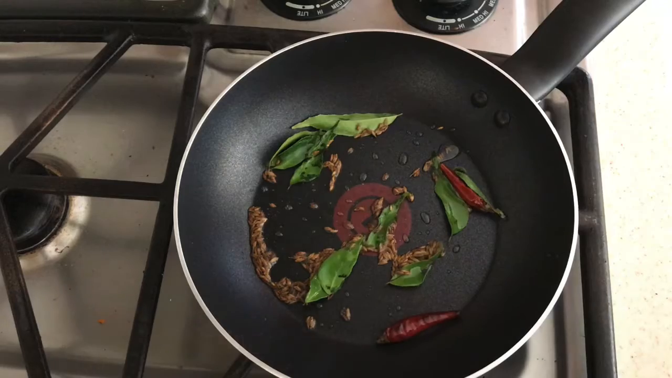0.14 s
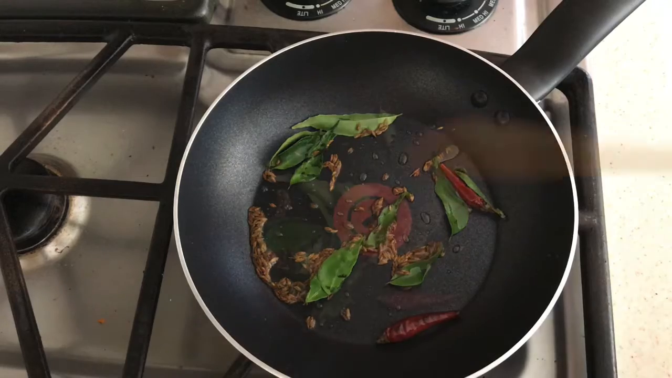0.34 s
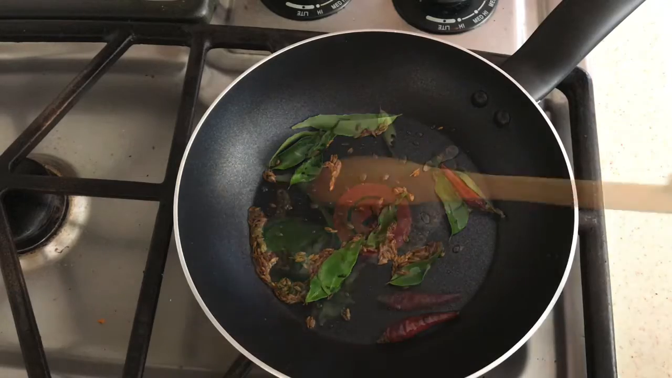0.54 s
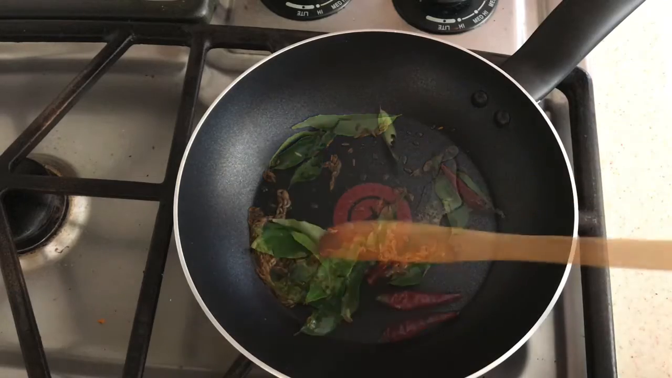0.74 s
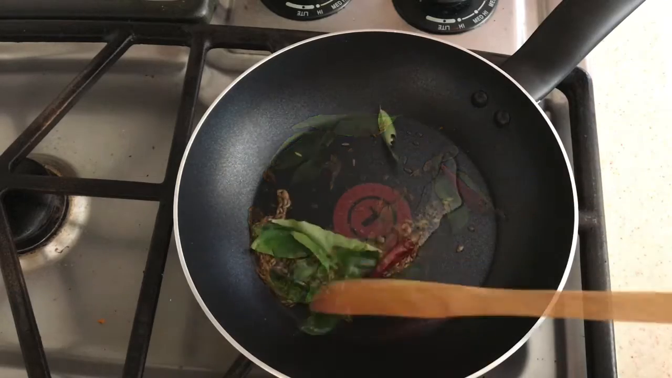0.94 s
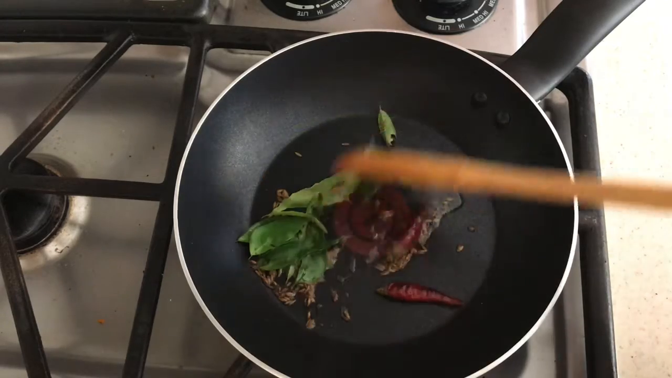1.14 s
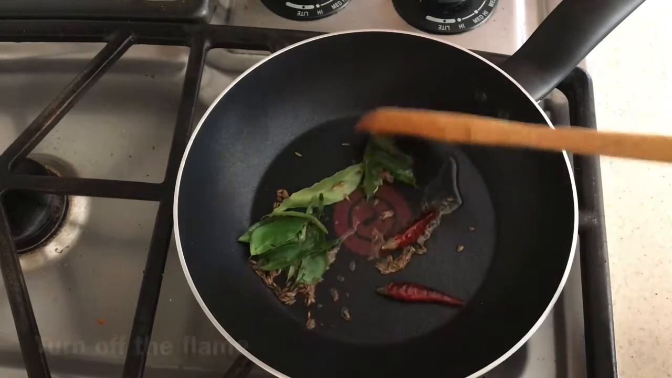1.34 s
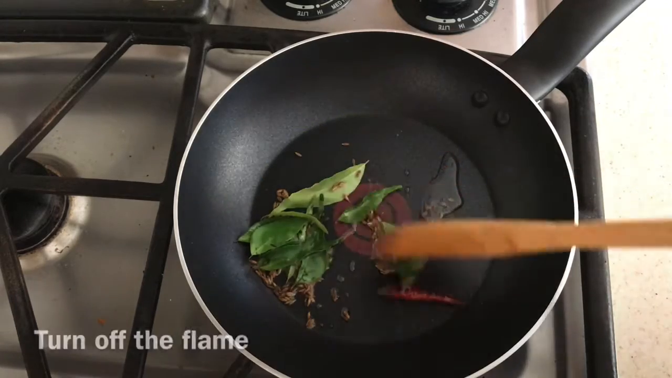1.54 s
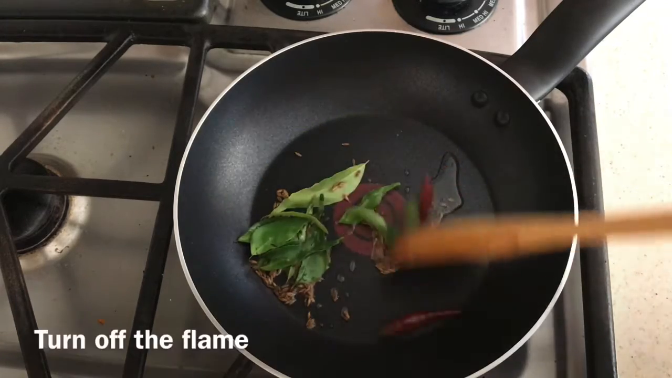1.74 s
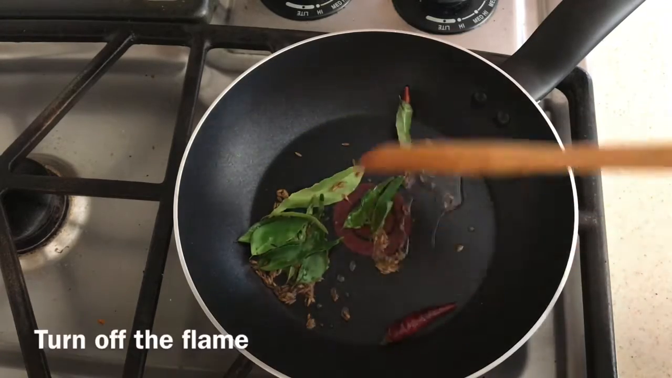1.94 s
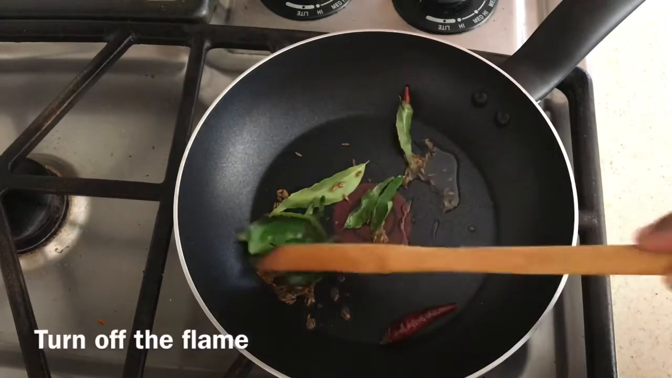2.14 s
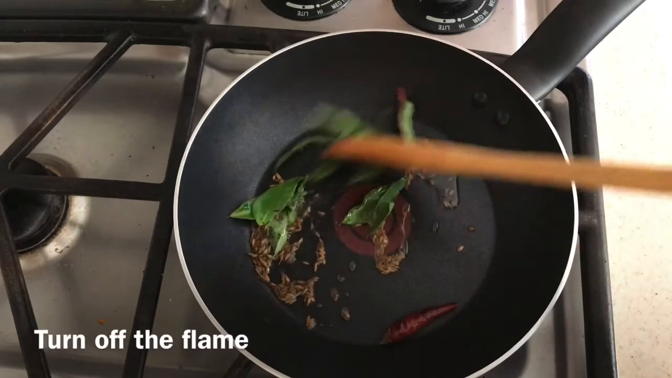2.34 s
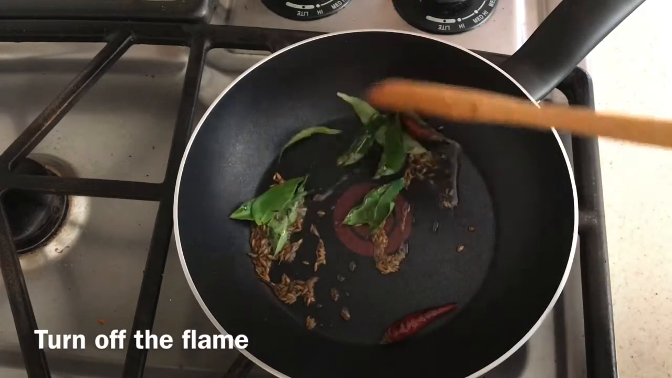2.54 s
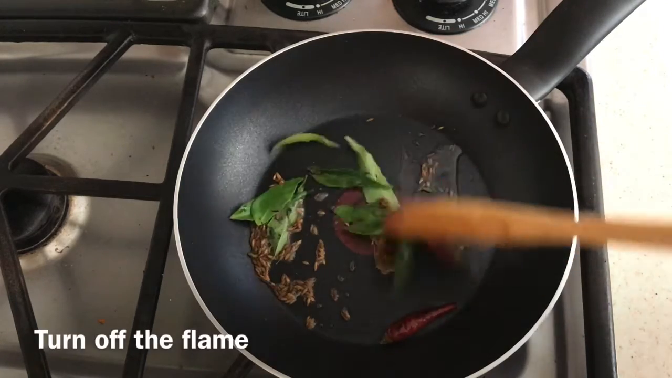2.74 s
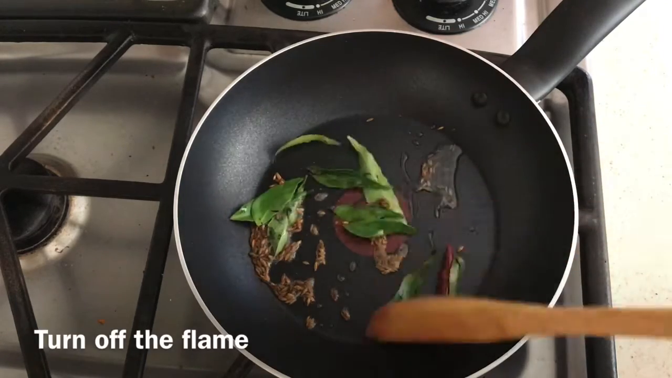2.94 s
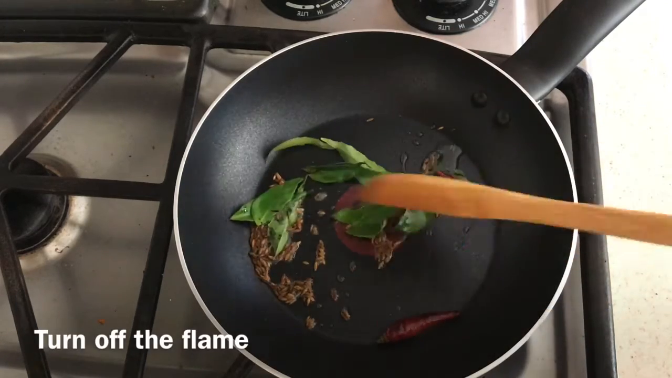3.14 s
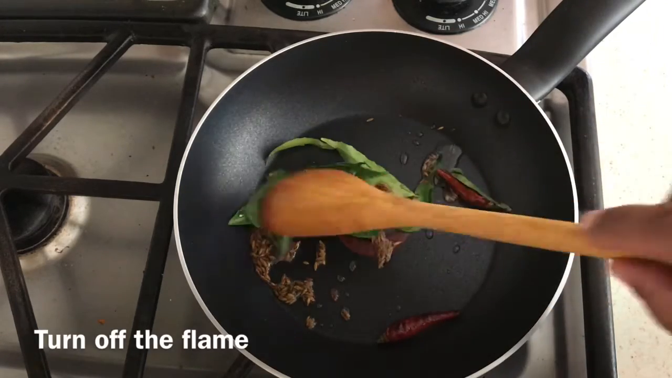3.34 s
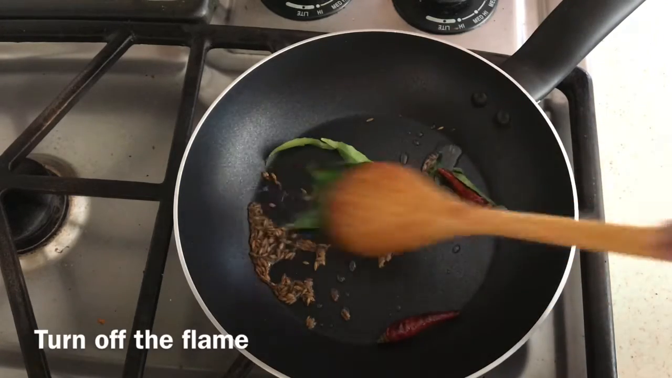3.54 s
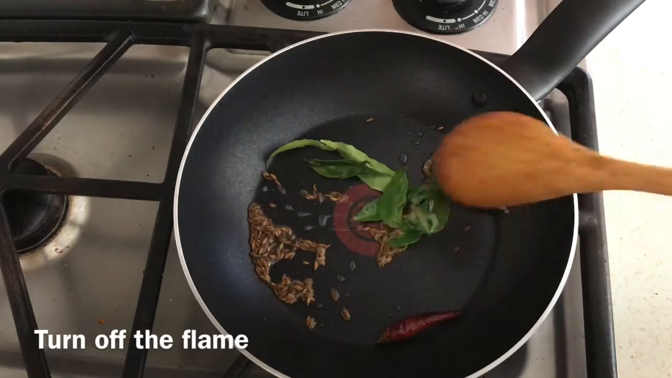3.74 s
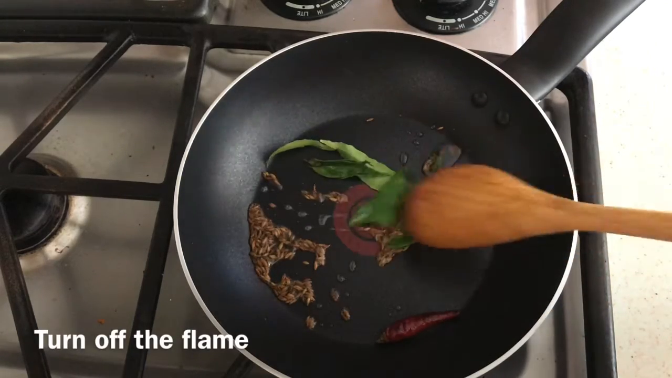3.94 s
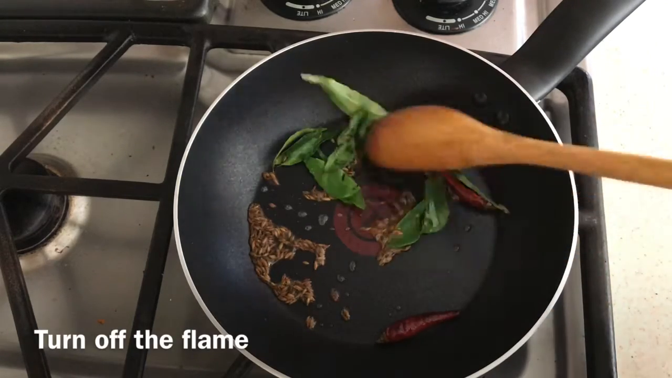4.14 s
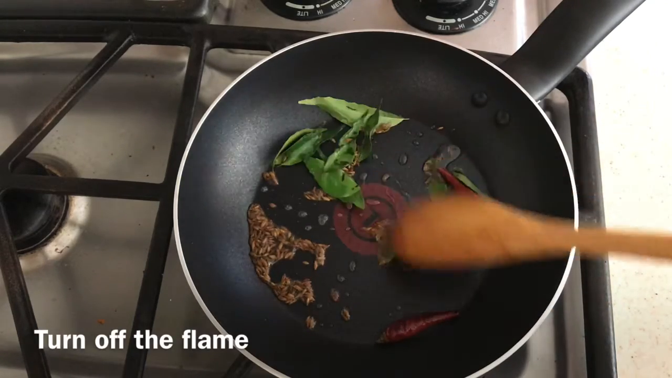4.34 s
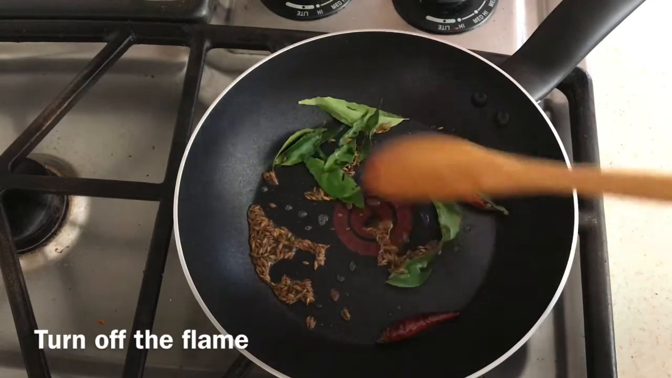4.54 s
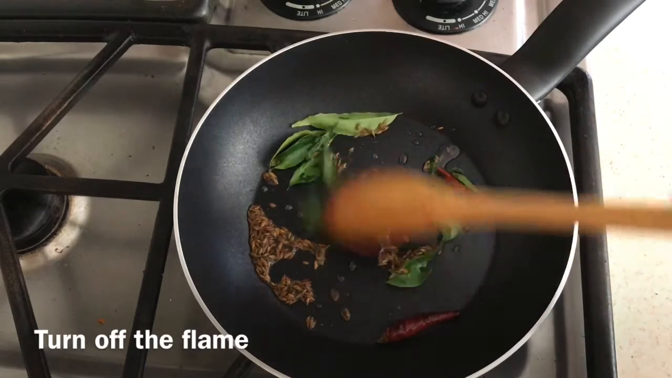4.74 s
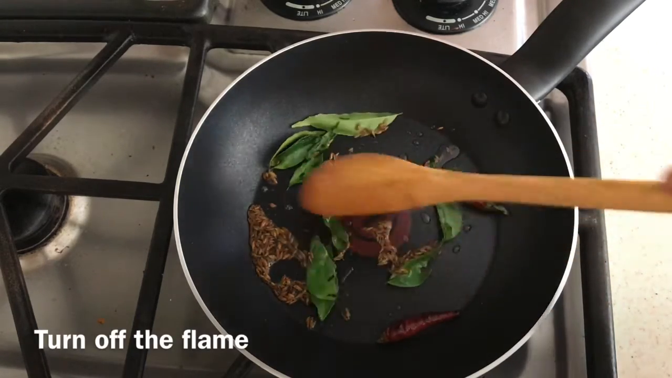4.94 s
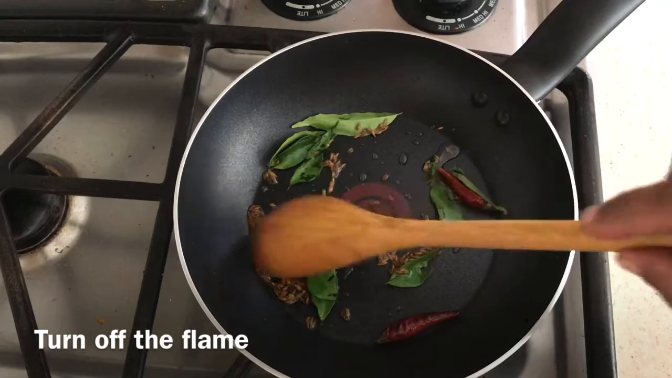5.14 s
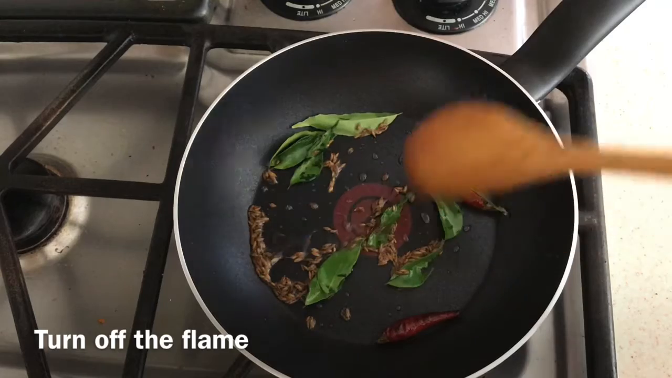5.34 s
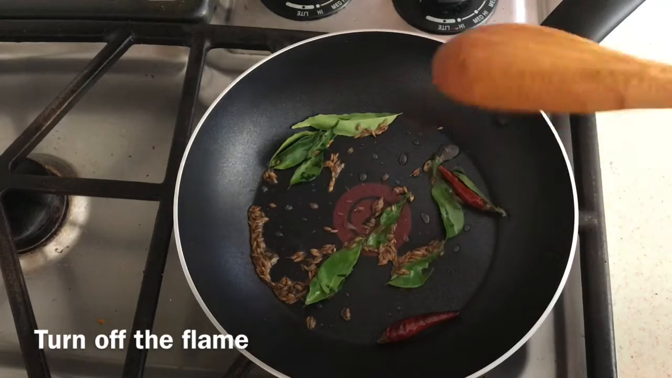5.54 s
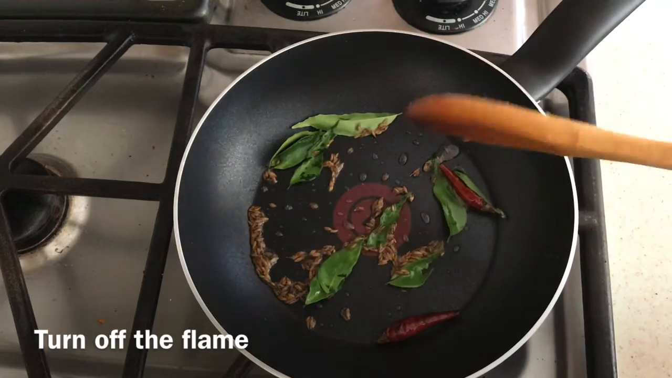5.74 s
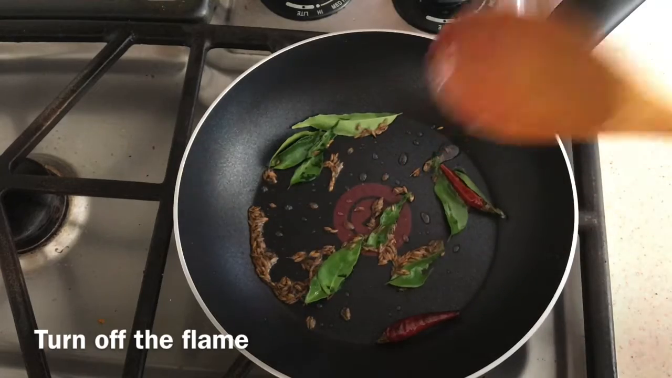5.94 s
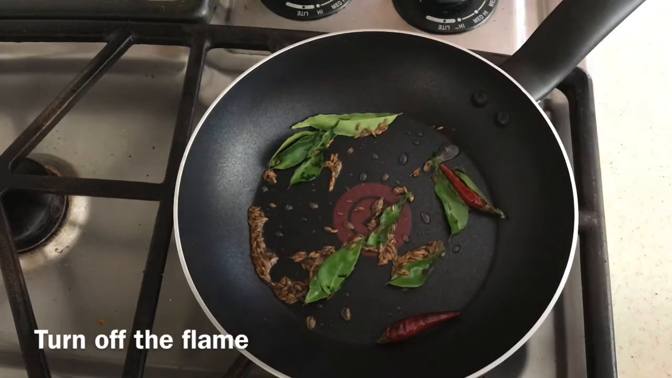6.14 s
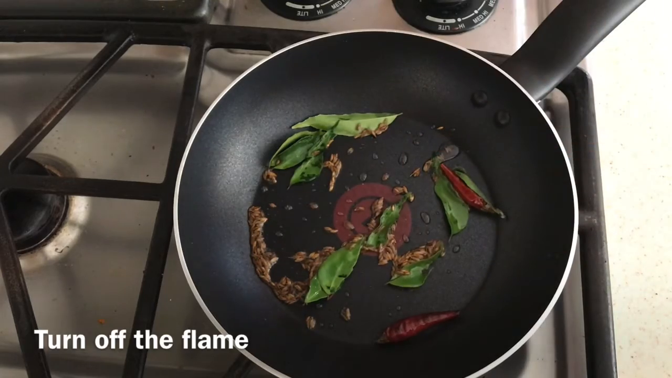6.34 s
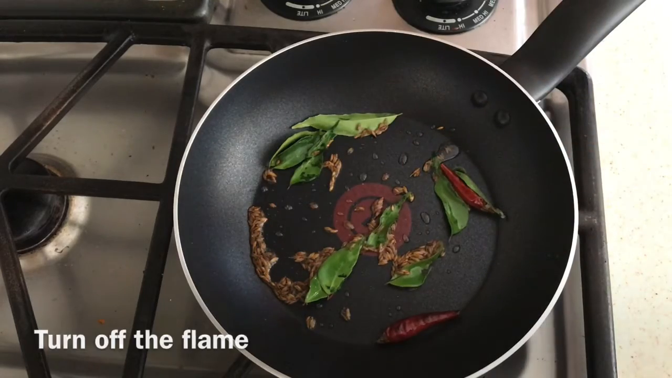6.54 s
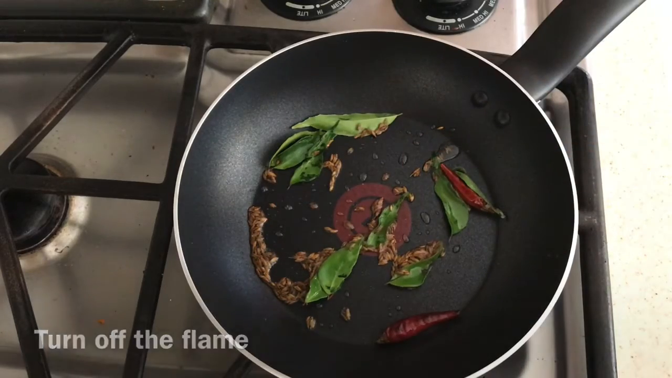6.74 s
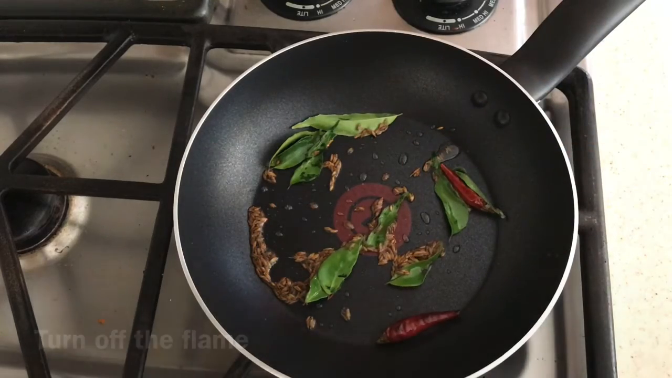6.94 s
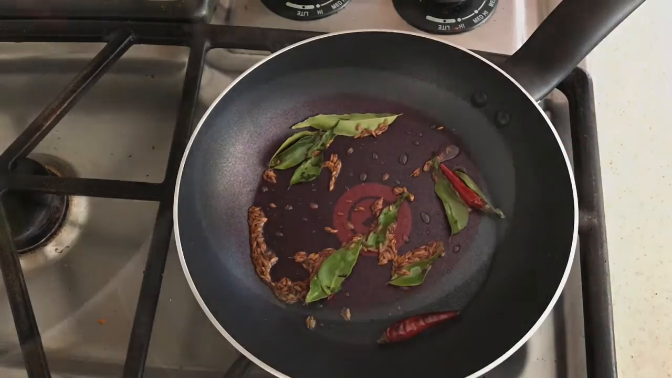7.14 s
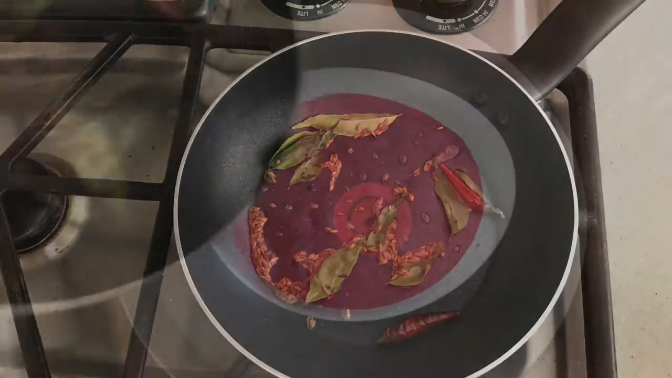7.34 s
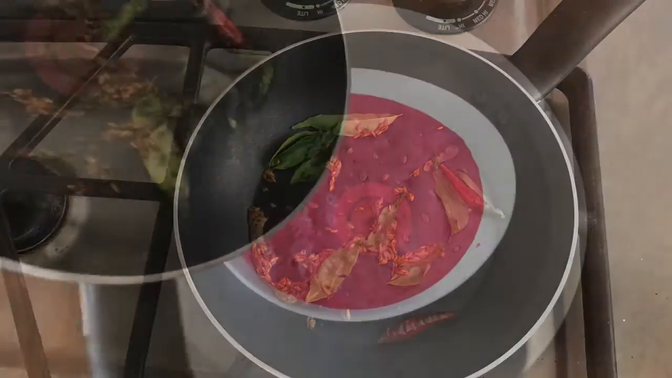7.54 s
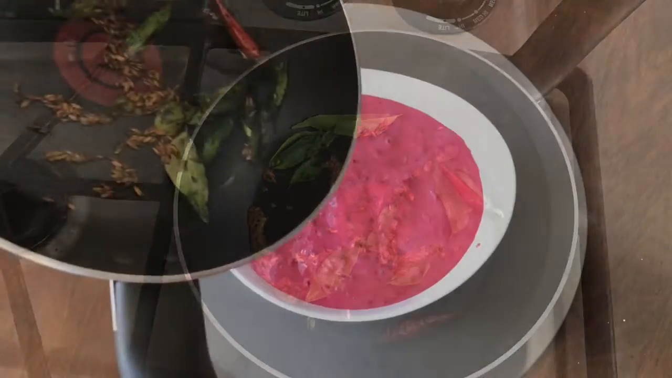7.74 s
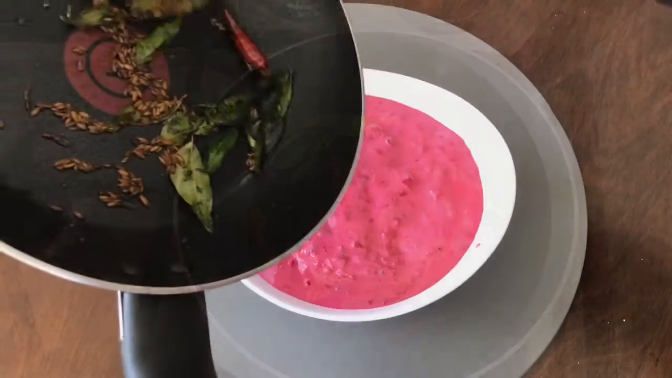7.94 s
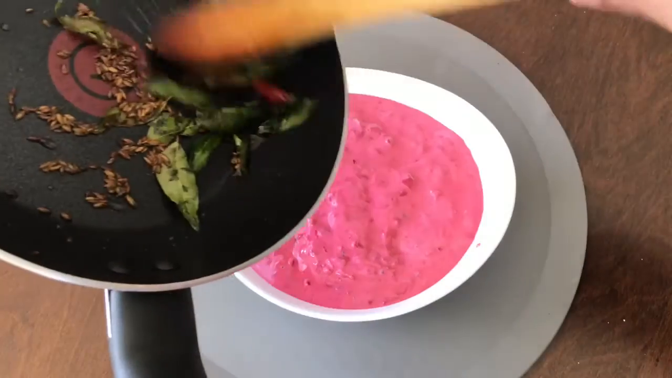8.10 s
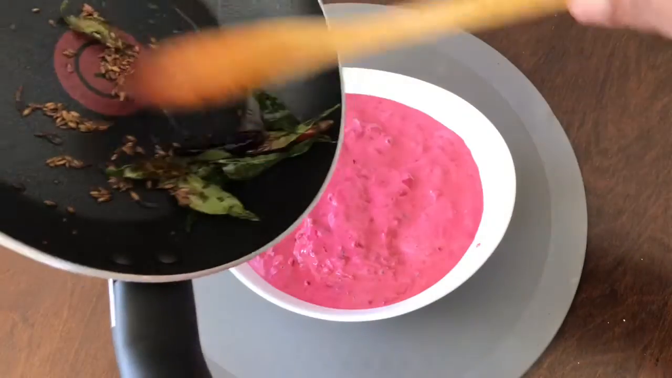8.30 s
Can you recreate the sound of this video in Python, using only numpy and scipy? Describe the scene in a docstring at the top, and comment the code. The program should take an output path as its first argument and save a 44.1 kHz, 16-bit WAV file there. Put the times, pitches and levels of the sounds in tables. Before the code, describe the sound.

Hot oil fizzes and pops in a frying pan, flaring with each wooden spoon stroke, then dies down before a short ringing scrape.

```python
"""A kitchen, one microphone close over a frying pan on a gas stove. Seeds and leaves crackle in hot oil,
tiny steam bubbles merging into a fizz. From 0.6 s a wooden spoon stirs: it knocks and rubs the pan,
which rocks on its grate, and the fizz flares with each stroke. After the last stroke, near 5 s,
the frying dies down. Near 8 s the spoon scrapes the pan, now lifted, so that it rings freely."""
import sys
import numpy as np
from scipy import signal
from scipy.fft import rfft, irfft, next_fast_len
from scipy.io import wavfile
from scipy.ndimage import uniform_filter1d

SR = 44100
rng = np.random.default_rng(int(sys.argv[2]) if len(sys.argv) > 2 else 0)


def waveform_to_disk(signal):
    """Save audio, clipped to [-1, 1], as 16-bit WAV at the path in sys.argv[1]."""
    frames = np.transpose(np.atleast_2d(signal))
    scaled = np.clip(frames, -1, 1) * 32767
    samples = np.round(scaled).astype(np.int16)
    wavfile.write(sys.argv[1], SR, samples)


N = 369116

# The spoon lands on the pan: start_s, peak_db, upper_modes_db, lowest_mode_db, thud_db
SPOON_KNOCKS = [(0.601, -8, 0, -42, -44.5), (1.368, -25, -37, 3, -44.5), (1.726, -6.5, -12, -14, -31),
                (2.808, -31.5, -4, -20, -34), (3.011, -21.5, -8, 0.5, -35.5),
                (4.305, -1.5, -7.5, -23.5, -36.5), (5.186, -26.5, -1, 5, -38)]
# The spoon drags over the pan and turns the leaves: start_s, length_s, rocking_db, rubbing_db, flare_db
SPOON_STROKES = [(0.617, 0.15, -50.5, -45, 1.5), (0.996, 0.17, -40.5, -41.5, 8), (1.373, 0.11, -49, -46, 3),
                 (1.719, 0.18, -43.5, -36.5, 9), (1.96, 0.12, -64, -64, 3), (2.179, 0.25, -44, -49, 7),
                 (2.792, 0.097, -50, -48, 8), (3.004, 0.14, -39.5, -42.5, 5),
                 (3.365, 0.26, -52.5, -89, 9.5), (3.74, 0.12, -62, -66, 6), (4.012, 0.13, -38.5, -38, 4),
                 (4.306, .16, -41, -62, 7), (4.658, 0.19, -44, -46, 8), (5.165, 0.15, -37.5, -42, 4)]


def gain_of(db):
    return 10 ** (np.asarray(db) / 20)


def unit_rms(x):
    return x / np.sqrt(np.mean(x ** 2) + 1e-20)


def curve_at(points, hz):
    """Value of a (frequency, value) curve, interpolated over log frequency."""
    point_hz, value = np.transpose(points)
    return np.interp(np.log(hz + 1), np.log(point_hz + 1), value)


def envelope(rows, column):
    """Gain over time from a dB column; silent before the first row, held after the last."""
    rows = np.array(rows)
    return gain_of(np.interp(np.arange(N) / SR, rows[:, 0], rows[:, column], left=-200))


def add(mix, start_s, sound):
    part = mix[round(start_s * SR):][:len(sound)]
    part += sound[:len(part)]


def coloured(x, spectrum):
    """The signal shaped by a (Hz, dB) curve, at unit RMS."""
    size = next_fast_len(len(x))
    gains = gain_of(curve_at(spectrum, np.fft.rfftfreq(size, 1 / SR)))
    return unit_rms(irfft(rfft(x, size) * gains, size)[:len(x)])


def resonate(x, hz, width_hz):
    """A resonance of gain 1."""
    pole = np.exp((2j * np.pi * hz - np.pi * width_hz) / SR)
    return 2 * signal.lfilter([1 - np.exp(-np.pi * width_hz / SR)], [1, -pole], x).real


def flicker(depth_db, samples):
    """A gain that wavers at random, smoothed over so many samples."""
    return gain_of(depth_db * unit_rms(uniform_filter1d(rng.standard_normal(N), samples)))


def kitchen():
    """Room tone: a low rumble, faint drones and a faint steady hiss."""
    drone_tones = [(312, 2.8, -70), (193.7, 2.5, -65), (1590, 60, -74.5)]  # steady tones: pitch_hz, width_hz, level_db
    rumble_spectrum = [(15, -81), (25, -5.5), (65, -4.5), (198, -0.5), (269, -5.5), (319, -8.5), (435, -15),
                       (574, -7), (757, -19), (1000, -27.5), (1300, -36.5), (2200, -120)]  # the room's rumble: frequency_hz, density_db
    hiss_spectrum = [(700, -4.5), (1500, -14.0), (5000, -13.5), (16000, -9.5)]
    drones = sum(gain_of(db) * unit_rms(resonate(rng.standard_normal(N), hz, width))
                 for hz, width, db in drone_tones)
    hiss = gain_of(-63) * coloured(rng.standard_normal(N), hiss_spectrum)
    rumble = gain_of(-59.5) * coloured(rng.standard_normal(N), rumble_spectrum)
    return rumble + drones + hiss


def seething(flare_peak=.55, flare_width=.55):
    """Strength of the frying, which flares in every stroke; peak and width are in stroke lengths."""
    frying_levels = [(0.0, -53), (0.4, -53.5), (0.9, -48), (1.6, -47), (2.0, -45), (2.55, -43.5),
                     (2.95, -42), (3.2, -45), (3.72, -44), (3.95, -44), (4.5, -49), (5.0, -45.5),
                     (5.67, -50.5), (6.25, -50.5), (7.0, -52), (7.57, -59), (7.86, -63), (8.37, -82.5)]  # the frying between strokes: time_s, level_db
    t = np.arange(N) / SR
    flare_db = sum(db * np.exp(-((t - start_s) / length_s - flare_peak) ** 2 / flare_width ** 2)
                   for start_s, length_s, _, _, db in SPOON_STROKES)
    return envelope(frying_levels, 1) * gain_of(flare_db)


def fizz(base_per_s=450, spread_db=3.5, pitches=16):
    """Countless tiny steam bubbles merge into hiss; larger ones crackle in spurts, at many pitches."""
    hiss_spectrum = [(530, -47), (900, 3), (1410, 3), (1560, 6.5), (1820, 1), (2590, 2), (3230, 9),
                     (4020, 4.5), (6310, 8), (10500, 3), (12300, 10), (15500, 0), (16500, 1.5)]  # the merged bubbles: frequency_hz, density_db
    heat = seething()
    activity = unit_rms(heat)  # stirred oil bursts more often
    chance = base_per_s / SR * flicker(depth_db=5, samples=900) * activity ** .4
    bursts = gain_of(spread_db * np.minimum(rng.exponential(1, N), 3)) * (rng.random(N) < chance)
    kind = rng.integers(0, pitches, N)
    grit = rng.standard_normal((pitches, 1024))
    pitch_hz = 15000 - np.geomspace(800, 12800, pitches)
    crackle = sum(signal.oaconvolve(bursts * (kind == k), pop(hz, 0.3, -16, grit[k]))[:N]
                  for k, hz in enumerate(pitch_hz))
    bands = signal.stft(coloured(rng.standard_normal(N), hiss_spectrum), nperseg=256)[2]
    # the hiss flickers in patches of pitch and time
    patches = uniform_filter1d(rng.standard_normal(bands.shape), 14, axis=0)
    patches = unit_rms(uniform_filter1d(patches, 5, axis=1))
    hiss = unit_rms(signal.istft(bands * gain_of(2 * patches), nperseg=256)[1][:N])
    return heat * (gain_of(-2) * unit_rms(crackle) + gain_of(-5) * hiss / activity ** 0.06)


def pop(hz, octaves, spatter_db, grit, size=1024):
    """One burst: a click coloured by its bubble, quick echoes off the pan wall and a short spatter."""
    f = np.fft.rfftfreq(2 * size, 1 / SR) + 1
    t = np.arange(size) / SR
    width = (abs(octaves) + 0.043) * np.where(f < hz, 2.0, 1.6)
    bubble = 1 / (1 + (np.log2(f / hz) / width) ** 2) ** 2
    slap = 0.16 * octaves ** 4 * np.exp(-(np.log2(f / 1300) / 0.58) ** 2)  # a wide burst slaps the oil
    power = (bubble + slap + gain_of(-56)) / (1 + (800 / f) ** 6)
    cepstrum = irfft(np.log(power + 1e-7) / 2)
    cepstrum[1:size] *= 2  # folding the cepstrum makes the click causal
    cepstrum[size + 1:] = 0
    click = irfft(np.exp(rfft(cepstrum)))[:size]
    arrivals = grit * gain_of(-6 - 60 * t / .003)
    arrivals[0] = 2.6  # the direct sound, ahead of its echoes
    spatter = grit * gain_of(spatter_db - 60 * t / 0.034)
    out = signal.fftconvolve(arrivals + spatter, click)[:size]
    return out / np.linalg.norm(out[:128])  # unit energy in the first 3 ms


def pops(small_count=220, low_hz=3400, high_hz=15800):
    """Seeds and steam pockets burst; lesser bursts crowd and grow where the oil seethes."""
    loud_pops = [(0.0456, -15, 5670, 0.53), (0.0761, -11, 8850, 0.7), (0.1447, -9.5, 10100, 0.25),
                 (0.2576, -11, 11400, 0.72), (0.3412, -13.5, 4500, 0.68), (0.4158, -17.5, 5815, 1.25),
                 (0.508, -11, 4510, 0.41), (0.694, -14, 3840, 0.31), (0.764, -1, 2220, 0.32),
                 (0.9856, -8, 3060, 0.38), (1.0575, -10, 9000, 0.78), (1.2639, -5, 7400, 0.51),
                 (1.2864, -4.5, 10880, 0.46), (1.3605, -1, 6900, 0.58), (1.397, 7, 11400, 0.98),
                 (1.5269, -2.5, 8350, 0.35), (1.6773, -4, 14300, 0.049), (1.7496, -4.5, 2320, 0.43),
                 (1.76, -5.5, 3700, 0.17), (1.805, -14, 4460, 0.21), (1.982, 8.5, 7900, 0.45),
                 (1.997, -0.5, 6900, 0.33), (2.0109, -2.5, 8300, 0.14), (2.043, -3, 12400, 0.18),
                 (2.0673, 6.5, 9000, 0.82), (2.0953, -5.5, 9200, 0.093), (2.188, -6.5, 5960, 0.067),
                 (2.2175, -5, 10400, 0.25), (2.2736, 7.5, 8550, 0.68), (2.3006, -8, 11100, 0.2),
                 (2.379, -11, 5370, 0.11), (2.3866, -7.5, 2530, 0.15), (2.5089, -12, 6200, 1.1),
                 (2.525, 9.5, 1480, 1.23), (2.556, -2, 8450, 0.38), (2.5975, -5, 4500, 0.65),
                 (2.6083, -5, 2900, 0.13), (2.6504, -1, 4020, 1.06), (2.735, -7, 10400, 1.2),
                 (2.7656, -3.5, 4000, 0.94), (2.798, -6, 4300, 0.7), (2.805, 7.5, 3700, 1.4),
                 (2.8093, 15.5, 5670, 1.7), (3.004, -5, 13000, 0.15), (3.05, -13, 9400, 0.51),
                 (3.134, -9.5, 4700, 0.45), (3.1656, -8, 5050, 0.42), (3.1983, -9.5, 4160, 1.7),
                 (3.2348, -1.5, 8400, 0.4), (3.2409, -4, 8000, 0.6), (3.2593, 0, 6450, 0.34),
                 (3.2664, 9.5, 12800, 0.32), (3.269, -1, 13300, 0.16), (3.3064, 5, 10500, 0.78),
                 (3.33, -9, 3900, 0.81), (3.371, -6, 13100, 0.19), (3.386, -9, 6330, 0.13),
                 (3.403, -5.5, 1970, 0.17), (3.41, -3, 9300, 0.56), (3.4203, -6, 2340, 0.3),
                 (3.447, -7.5, 2680, 0.3), (3.465, -11.5, 2700, 0.3), (3.4956, 5.5, 5570, 0.083),
                 (3.5393, -1.5, 7100, 1), (3.5444, -5, 9800, 0.33), (3.5935, -6, 4130, 0.14),
                 (3.6228, 5, 10200, 0.79), (3.6366, -1, 12000, 0.6), (3.6476, -6.5, 4500, 1.2),
                 (3.7736, 1, 4400, 1.5), (3.7802, -7, 7000, 1.1), (3.7888, -0.5, 8800, 0.95),
                 (3.797, -14, 7000, 0.84), (3.8067, -12, 11300, 0.45), (3.823, -10, 9000, 0.99),
                 (3.8323, -4.5, 9000, 0.49), (3.893, -5.5, 9600, 0.36), (3.9134, -10, 9000, 0.17),
                 (3.998, -7, 10500, 0.082), (4.0534, -4, 8300, 0.78), (4.1201, -3, 10100, 0.15),
                 (4.2804, -3, 3640, 0.65), (4.385, -2, 13500, 0.59), (4.421, -3.5, 11900, 0.14),
                 (4.6138, -7, 9500, 0.82), (4.695, -2, 9500, 0.071), (4.735, -13, 8400, 0.68),
                 (4.768, 2, 9700, 0.2), (4.7805, -1, 10400, 0.082), (4.7961, 12, 12100, 0.27),
                 (4.8755, 13.5, 9100, 0.67), (5.0508, 12, 5660, 1.56), (5.1313, 3.5, 5840, 0.71),
                 (5.1519, 3.5, 8340, 0.59), (5.231, -5, 9050, 0.19), (5.2973, -7, 12700, 0.51),
                 (5.3991, 9, 7000, 0.6), (5.5309, -12, 8100, 0.11), (5.7673, -13, 10400, 0.14),
                 (5.8045, -10, 9300, 0.1), (6.0117, -18, 3780, 0.77), (6.088, -9, 12200, 0.4),
                 (6.17, -8, 3030, 0.56), (6.2314, -2.5, 3670, 0.17), (6.3662, -16, 6200, 0.73),
                 (6.4041, -8, 4400, 0.74), (6.491, -10.5, 7600, 0.24), (6.553, -13, 6350, 1),
                 (6.658, -9, 5400, 0.25), (6.751, -10.5, 4500, 0.1), (6.945, -14.5, 5870, 0.42),
                 (6.975, -11.5, 8400, 0.71), (7.0437, -9, 10300, 0.32), (7.1995, -17, 5930, 0.58),
                 (7.2407, -13.5, 4570, 0.54), (7.315, -16, 4870, 1.5), (7.4069, -13, 4730, 0.57),
                 (7.593, -13.5, 3920, 0.42), (7.6628, -1.5, 2300, 0.42), (7.714, -20, 7000, 0.6),
                 (7.755, -22.5, 7000, 0.55), (7.838, -28.5, 6020, 0.53)]  # the loudest bursts: start_s, energy_db, pitch_hz, spread_octaves
    grits = rng.standard_normal((len(loud_pops) + small_count, 1024))
    heat = unit_rms(seething())
    when, size, pitch, spread = rng.random((small_count, 4)).T
    crowding = heat ** 1.3
    at = np.searchsorted(np.cumsum(crowding) / np.sum(crowding), when).clip(0, N - 1)
    small_db = -16.5 - 3.5 * np.log(size.clip(.08, 1)) + 20 * np.log10(heat[at] ** .55)
    small_hz = low_hz + (high_hz - low_hz) * pitch ** .7
    small_pops = list(zip(at / SR, small_db, small_hz, .1 + .75 * spread ** 2))
    out = np.zeros(N)
    for (start_s, db, hz, octaves), grit in zip(loud_pops + small_pops, grits):
        spatter_db = -17 + 0.035 * db  # bigger bursts spatter more
        add(out, start_s, gain_of(db) * pop(hz, octaves, spatter_db, grit))
    return out


def pan(oil, grains_per_s=600):
    """The spoon's knocks, its gritty rubbing and the seething oil ring the same modes of the pan."""
    pan_modes = [(742, 2.5, 0.26), (818.4, 4.5, 0.082), (874, 0, 0.029), (939, 4, 0.018), (983, -17, 0.055),
                 (1120, -28, 0.039), (1535, -7, 0.083), (1590, -3.5, 0.055), (1950, -14.5, 0.031),
                 (2560, -11.5, 0.064), (2680, -5.5, 0.041)]  # the pan resting on the grate: pitch_hz, level_db, t60_s
    t, out = np.arange(SR // 2) / SR, np.zeros(N)
    hz, db, t60 = np.transpose(pan_modes)[:, :, None]
    modes = gain_of(db - 60 * t / t60) * np.sin(2 * np.pi * hz * t)
    upper, lowest = hz > 1300, hz == hz.min()
    push = np.diff(signal.windows.hann(30), 2)  # wood meets metal briefly; no net thrust radiates
    spots_db = 2 * rng.standard_normal((len(SPOON_KNOCKS), len(hz), 1))  # each spot favours other modes
    for (start_s, peak_db, upper_db, lowest_db, _), spot_db in zip(SPOON_KNOCKS, spots_db):
        weights = gain_of(spot_db + upper_db * upper + lowest_db * lowest)
        knock = np.convolve((weights * modes).sum(0), push)
        add(out, start_s, gain_of(peak_db) * knock / abs(knock).max())
    chance = grains_per_s / SR
    grit = rng.standard_normal(N) * (rng.random(N) < chance) / np.sqrt(chance)
    force = grit * spoon_drag(column=3) + gain_of(-18) * oil
    body = np.convolve((gain_of(-4 * upper - 1.6 * lowest) * modes).sum(0), push)
    out += signal.oaconvolve(force, body / np.linalg.norm(body))[:N]
    bass_cut = signal.butter(3, 620, "high", fs=SR, output="sos")  # a small pan radiates no bass
    return signal.sosfilt(bass_cut, out)


def spoon_thuds(wood_hz=520, width_hz=330, t60_s=0.06):
    """The spoon's wood answers each knock with a short dull puff."""
    t, out = np.arange(2048) / SR, np.zeros(N)
    for start_s, *_, thud_db in SPOON_KNOCKS:
        burst = rng.standard_normal(len(t)) * gain_of(-60 * t / t60_s)
        puff = resonate(resonate(burst, wood_hz, width_hz), wood_hz, width_hz)
        onset_rms = np.sqrt(np.mean(puff[:512] ** 2))
        add(out, start_s, gain_of(thud_db) * puff / onset_rms)
    return out


def spoon_drag(column):
    """Force of the spoon, quick to grip and slow to let go; column 2 rocks the pan, column 3 rubs it."""
    out = np.zeros(N)
    for stroke in SPOON_STROKES:
        start_s, length_s = stroke[:2]
        progress = np.linspace(0, 1, round(length_s * SR))
        add(out, start_s, gain_of(stroke[column]) * progress ** 0.19 * (1 - progress))
    return out


def grate():
    """Each drag shakes the pan on the iron grate, whose low modes shudder on."""
    grate_modes = [(73.3, -9, 0.4), (93, -5.5, 0.29), (131, -3.5, 0.28), (213.5, -5, 0.088),
                   (336, -11.5, 0.14)]  # the iron grate: pitch_hz, level_db, t60_s
    t = np.arange(SR // 2) / SR
    ring = sum(gain_of(db - 60 * t / t60) * np.sin(2 * np.pi * hz * t) for hz, db, t60 in grate_modes)
    shaking = spoon_drag(column=2) * rng.standard_normal(N)
    return signal.oaconvolve(shaking, ring / np.linalg.norm(ring))[:N]


def scrape(squeak_s=8.238, squeak_width_s=0.015):
    """Friction hisses and drives the modes of the hand-held pan; the lowest one sings steadily."""
    lifted_modes = [(804, 4.2, -3), (1560, 66, -1), (2530, 38, -5), (3780, 34, -1.5), (4480, 42, -12),
                    (5260, 25, -7), (5710, 29, -13), (5950, 56, -13), (6750, 180, -17), (7700, 60, -22)]  # the pan ringing freely: pitch_hz, width_hz, level_db
    levels = [(7.88, -90, -66, -49.5), (7.915, -45, -56, -56), (8.0, -63, -54.5, -50.5),
              (8.08, -51, -48.5, -39), (8.12, -41, -45, -38.5), (8.16, -50, -48, -40.5),
              (8.185, -34, -51, -40), (8.215, -42, -49, -35), (8.28, -47, -70, -59), (8.37, -71, -78, -77)]  # course of the scrape: time_s, lowest_mode_db, upper_modes_db, hiss_db
    hiss_spectrum = [(530, -37), (900, -15), (2530, -7), (3470, -9), (6790, -0.5), (11600, -6.5),
                     (15700, -10), (16500, -38)]  # wood sliding on metal: frequency_hz, density_db
    (low_hz, low_width, low_db), *upper_modes = lifted_modes
    friction = rng.standard_normal(N)
    swing = resonate(friction, low_hz, low_width)
    swing /= abs(signal.hilbert(swing, next_fast_len(N))[:N]) + 1e-9  # stick and slip hold it even
    sing = gain_of(low_db) * envelope(levels, 1) * swing
    drive = friction * envelope(levels, 2)
    ring = sum(gain_of(db) * resonate(drive, hz, width) * np.sqrt(SR / (2 * np.pi * width))
               for hz, width, db in upper_modes)
    grain = flicker(depth_db=3.3, samples=90) * rng.standard_normal(N)
    hiss = envelope(levels, 3) * coloured(grain, hiss_spectrum)
    t = np.arange(N) / SR
    squeak_hz = lifted_modes[2][0]  # the third mode squeaks as the spoon lets go
    squeak = np.exp(-((t - squeak_s) / squeak_width_s) ** 2) * np.sin(2 * np.pi * squeak_hz * t)
    return sing + ring + gain_of(-37) * squeak + hiss


def room(near):
    """The kitchen's reflections: sparse echoes of random sign, the treble dying first."""
    decay_times = [(700, 0.45), (2000, 0.28), (6000, 0.17), (15000, 0.11)]  # reverberation: frequency_hz, t60_s
    taps = np.zeros(SR // 2)
    at = np.arange(200, len(taps) - 20, 20)
    taps[at + rng.integers(0, 20, len(at))] = rng.choice([-1., 1.], len(at))
    hz, t, bands = signal.stft(taps, SR, nperseg=256)
    decay = gain_of(-60 * t / curve_at(decay_times, hz)[:, None])
    tail = signal.istft(bands * decay, SR, nperseg=256)[1]
    return signal.oaconvolve(near, tail / np.linalg.norm(tail))[:N]


def scene():
    """Oil, pan and spoon close up, with the kitchen faint behind them, in mono."""
    # Air in the pan rings near 6.2 kHz; the microphone dulls a band near 10.5 kHz
    colour_bands = [(6200, 100, 0.5), (10500, 630, -0.49)]  # centre_hz, width_hz, share
    oil = pops() + fizz()
    colouring = sum(share * resonate(oil, hz, width) for hz, width, share in colour_bands)
    near = oil + colouring + pan(oil) + spoon_thuds() + scrape()
    return (near + gain_of(-15.5) * room(near) + grate() + kitchen())[None]


def record(dry, ceiling=1.05, bass_cut_hz=55, band_limit_hz=15900):
    """The loudest cracks overload the microphone softly; then come its bass cut and band limit."""
    overloaded = ceiling * np.tanh(dry / ceiling)
    thinned = signal.sosfilt(signal.butter(3, bass_cut_hz, "high", fs=SR, output="sos"), overloaded)
    band_limit = signal.firwin(511, band_limit_hz, window=("kaiser", 9), fs=SR)
    return signal.oaconvolve(thinned, band_limit[None], "same")


dry = scene()
out = record(dry)
waveform_to_disk(out)
```